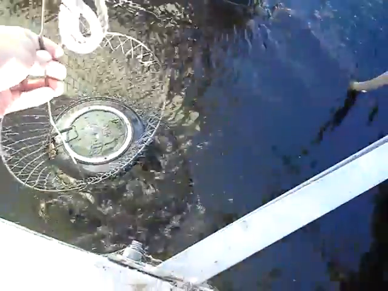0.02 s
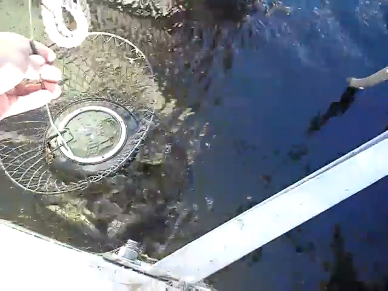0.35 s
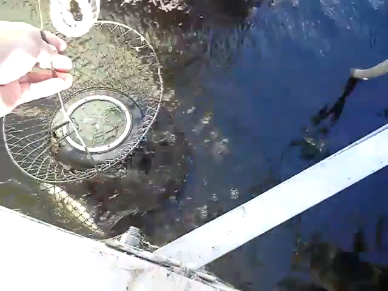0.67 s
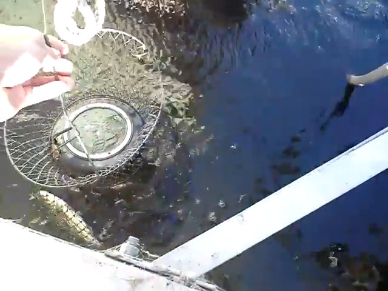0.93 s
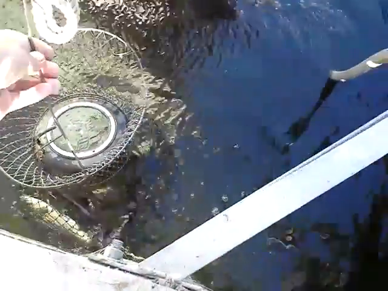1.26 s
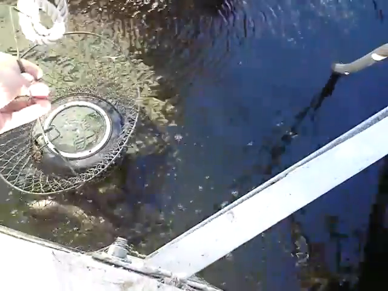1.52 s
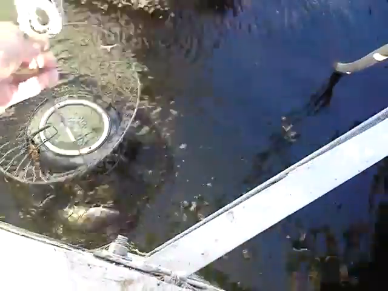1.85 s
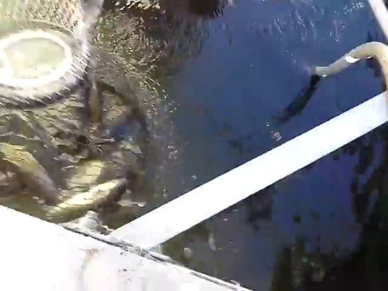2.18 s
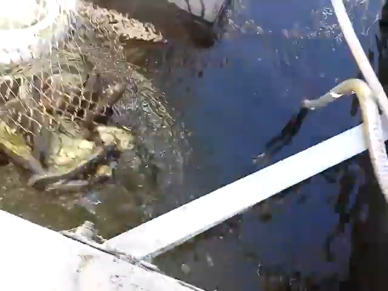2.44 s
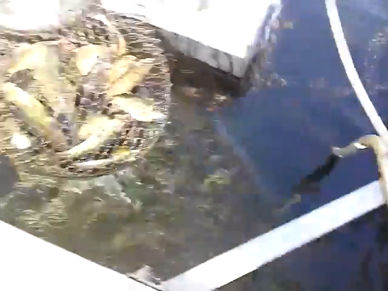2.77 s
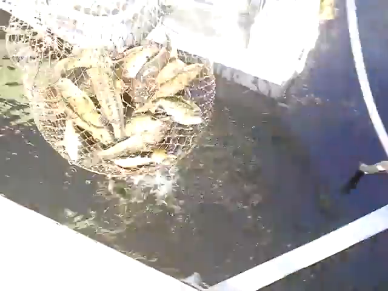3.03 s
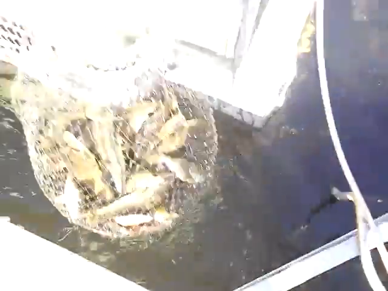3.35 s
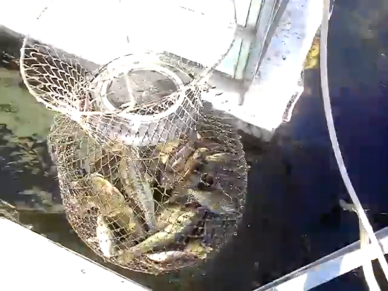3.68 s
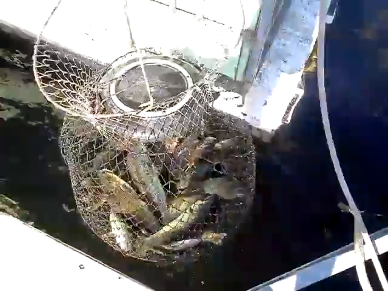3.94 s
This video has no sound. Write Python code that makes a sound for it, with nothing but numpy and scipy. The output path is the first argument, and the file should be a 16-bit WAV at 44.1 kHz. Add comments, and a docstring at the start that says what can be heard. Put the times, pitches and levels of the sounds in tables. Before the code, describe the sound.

Gusty wind rumbling on the microphone over small splashes and water draining from a fish basket.

```python
"""Beside a dock, one microphone in the open air, close to a wire fish basket. Gusts buffet it throughout.
At first the basket is under: the surface trickles, fish flick and splash, and one pings the wire at 1.5 s.
From 2.2 s the basket is hauled out; large bubbles glug, then water pours from the mesh and patters down.
Around 3.5 s the strongest gust blows a hollow note across the microphone port and overloads the input."""
import sys
import numpy as np
from scipy.fft import rfft, irfft, next_fast_len
from scipy.io import wavfile
from scipy.ndimage import map_coordinates

SR = 44100
rng = np.random.default_rng(int(sys.argv[2]) if len(sys.argv) > 2 else 0)


def pcm_store(signal):
    """Save signal as 16-bit PCM."""
    levels = np.round(np.clip(np.atleast_2d(signal), -1, 1) * 32767)
    wavfile.write(sys.argv[1], SR, levels.astype(np.int16).T)


N = 176400

# Water at the basket, beside the dock: time_s, level_db
WATER_FLOW = [(0, -33), (.3, -47), (1.15, -38.5), (1.45, -41.5), (1.62, -37), (1.69, -50), (1.8, -36.5),
              (2.07, -52), (2.2, -41.5), (2.36, -39.5), (2.5, -29), (2.62, -20.5), (2.72, -26), (2.86, -26),
              (3.02, -18), (3.75, -26.5), (3.86, -31), (4, -26)]
# Spectrum of the surface stirred by the fish: frequency_hz, gain_db
RIPPLE_SPECTRUM = [(300, -19.5), (1000, -2.5), (2000, -13), (3300, -11.5), (5000, -1), (6200, -9),
                   (7500, -34), (9000, -37)]
# Spectrum of water falling from the mesh: frequency_hz, gain_db
SPRAY_SPECTRUM = [(300, -23), (750, -6), (1500, -12), (2800, -13), (5000, -5), (6000, -8), (7300, -11),
                  (10000, -15.5)]
def water(lift_start_s=2.23, lift_length_s=0.12, drop_hz=4046, drop_spread=0.444, drops_db=-1):
    """Droplets over a hiss: an uneven trickle while the basket is under, a steadier spray as it drains."""
    flow_db, = curves(WATER_FLOW)
    drips = amp(drops_db) * droplets(drop_hz, drop_spread, count=2000)
    drops = amp(drops_db) * droplets(drop_hz, drop_spread, count=6000)
    hiss, clumps = rng.standard_normal(N), wobble(50)
    ripple = amp(3.5 * clumps) * unit(coloured(drips + hiss, RIPPLE_SPECTRUM))
    spray = amp(clumps) * unit(coloured(drops + hiss, SPRAY_SPECTRUM))
    lifted = np.clip((np.arange(N) / SR - lift_start_s) / lift_length_s, 0, 1)
    return amp(flow_db) * ((1 - lifted) * ripple + lifted * spray)


def droplets(centre_hz, spread, count, samples=500, ring_cycles=49, scatter_db=3.5):
    """A steady patter of tiny ringing bubbles, rms 1."""
    start = rng.integers(0, N, count)[:, None]
    hz = np.clip(centre_hz * np.exp(spread * rng.standard_normal((count, 1))), 500, 10000)
    strength = amp(scatter_db * np.minimum(rng.exponential(size=(count, 1)), 4))
    t = np.arange(samples) / SR
    rings = strength * np.sin(2 * np.pi * hz * t) * fade(t, ring_cycles / hz)
    return unit(np.bincount((start + np.arange(samples)).ravel(), rings.ravel(), N)[:N])


# Large bubbles where the basket breaks the surface: start_s, level_db, pitch_hz
LARGE_BUBBLES = [(2.506, -21, 1074), (2.526, -15, 639), (2.552, -16, 685), (2.588, -12, 782),
                 (2.643, -15.5, 690)]
def glugs(t60_s=0.09, attack_s=0.0024, rise_per_s=1.2, rough_rad=0.31):
    """Air enters under the basket: deformed bubbles ring unevenly and rise in pitch amid a fine froth."""
    t = np.arange(SR // 5) / SR
    froth = droplets(centre_hz=850, spread=.25, count=1000, samples=2000)
    out = amp(-29.5) * swell(2.61, .1) * froth
    for start_s, db, hz in LARGE_BUBBLES:
        phase = 2 * np.pi * hz * (t + rise_per_s * t ** 2 / 2) + rough_rad * wobble(hz / 2)[:len(t)]
        add(out, start_s, amp(db) * np.sin(phase) * fade(t, t60_s) * (1 - np.exp(-t / attack_s)))
    return out


# Flicking fish and falling drops at the surface: start_s, level_db, pitch_hz
SURFACE_SPLASHES = [(0.536, -31.5, 4860), (0.829, -33.5, 4840), (1.546, -24, 5080), (1.57, -31, 2180),
                    (1.618, -33.5, 4200), (1.735, -37, 5900), (1.773, -29, 5800), (1.881, -25, 3180),
                    (2.215, -29.5, 5250)]
def splashes(width_octaves=0.34, attack_s=0.00074, t60_s=0.063):
    """Each flick of a tail or large drop throws a short burst of spray."""
    out, t = np.zeros(N), np.arange(SR // 4) / SR
    envelope = 2 * fade(t, t60_s) * (1 - np.exp(-t / attack_s))
    for start_s, db, pitch_hz in SURFACE_SPLASHES:
        noise = rng.standard_normal(len(t))
        spray = filtered(noise, lambda hz: 1 / (1 + (np.log2((hz + 1) / pitch_hz) / width_octaves) ** 2))
        add(out, start_s, amp(db) * unit(spray) * envelope)
    return out


# Ringing modes of the basket's mesh: pitch_hz, level_db, t60_s
WIRE_MODES = [(3210, -25.5, 0.074), (3640, -23, 0.07), (4840, -13, 0.034), (7300, -27, 0.037)]
def wire_ping(start_s=1.548):
    """A fish knocks the wet mesh, which gives one short ping."""
    out, t = np.zeros(N), np.arange(SR // 4) / SR
    add(out, start_s, sum(amp(db) * np.sin(2 * np.pi * hz * t) * fade(t, t60) for hz, db, t60 in WIRE_MODES))
    return out


# Gusts right on the microphone: time_s, level_db, eddy_edge_hz
GUSTS = [(0, -4.5, 195.6), (.21, -10.5, 151.6), (.29, -23.5, 143), (.37, -9, 199.7), (.48, -5.5, 208),
         (.57, -19.5, 173.7), (.78, -22.5, 150.5), (.93, -18, 157.7), (1.48, -17, 196), (1.52, -23.5, 162),
         (1.83, -27.5, 100), (1.96, -14, 230), (2.09, -25.5, 150), (2.29, -20, 149), (2.35, -43, 125),
         (2.52, -32, 99.4), (2.85, -30.5, 93.4), (2.875, -7.5, 180.2), (3.12, -16, 168.6),
         (3.24, -6, 214.7), (3.46, -6.5, 215.3), (3.5, 2.5, 450), (3.67, 1, 594), (3.785, -5, 777),
         (3.82, -16, 376), (4, -13, 484)]
# Sharp puffs on top of them: centre_s, half_length_s, boost_db, rise_octaves
SHARP_PUFFS = [(0.064, 0.022, 9.5, 0.89), (0.188, 0.02, 10.5, 0.8), (0.472, .01, 7.5, 0.84),
               (0.522, 0.0069, 11, 1.05), (0.647, 0.008, 16.5, 1.25), (0.9, 0.009, 19.5, 1.05),
               (0.975, 0.018, 10.5, 1.12), (1.127, 0.008, 20, 1.65), (1.169, 0.012, 7.5, 1),
               (1.242, 0.0068, 10.5, 0.77), (1.303, 0.011, 8.5, 1.27), (1.542, 0.0066, 21, 0.84),
               (2.034, 0.0078, 8.5, 0.4), (2.164, 0.016, 17.5, 0.6), (2.214, 0.0097, 15, 0.7),
               (2.899, 0.016, 7.5, 0.69), (2.965, 0.0087, 8, .5), (3.165, 0.011, 19.5, 1.35),
               (3.282, .02, 7.5, 1.0), (3.366, .007, 7.5, 0.68), (3.534, .012, 1, .6), (3.66, .011, 5, .5)]
def wind(flutter_db=4.5, flutter_octaves=0.083, rumble_db=-8, sputter_db=-3):
    """Eddies sweep the microphone: faster air buffets higher and more raggedly, with less slow rumble."""
    level_db, edge_hz = curves(GUSTS)
    speed = edge_hz / EDDY_EDGE_HZ
    flutter = wobble(65)  # turbulence
    buffet_db = flutter_db * flutter
    octaves = np.log2(speed) + flutter_octaves * speed * flutter
    for centre_s, half_length_s, boost_db, rise_octaves in SHARP_PUFFS:
        puff = swell(centre_s, half_length_s)
        buffet_db += boost_db * puff
        octaves += rise_octaves * puff
    swings = amp(rumble_db) * np.minimum(1 / speed, 1) * rumble()
    pops = amp(sputter_db) * np.minimum(speed, 1) ** 2 * sputter()
    return amp(level_db) * (amp(buffet_db) * eddies(octaves) + swings + pops)


EDDY_EDGE_HZ = 200
# Spectrum of the buffeting with its upper edge at EDDY_EDGE_HZ: frequency_hz, gain_db
EDDY_SPECTRUM = [(15, -6.5), (40, -1.5), (110, -1), (200, -3), (330, -8), (520, -16), (900, -30.5),
                 (1800, -57), (8000, -130)]
def eddies(edge_octaves, count=12):
    """Buffeting noise whose spectrum slides: a cross-fade of noises half an octave apart."""
    out = np.zeros(N)
    position = np.clip(2 * edge_octaves + 3, 0, count - 1)
    for k in range(count):
        shift = 2 ** ((k - 3) / 2)
        noise = unit(coloured(rng.standard_normal(N), [(hz * shift, db) for hz, db in EDDY_SPECTRUM]))
        out += noise * np.sqrt(np.maximum(1 - np.abs(position - k), 0))
    return out


# Hollow note at the microphone port: time_s, level_db, pitch_hz
PORT_NOTE = [(3.3, -70, 400), (3.52, -13, 520), (3.77, -3.5, 1051), (3.82, -17, 499.5),
             (3.93, -13.5, 479.6), (3.97, -6.5, 762)]
def howl(width_hz=380):
    """The strongest gust blows across the port: a narrow band of noise that glides in pitch."""
    level_db, hz = curves(PORT_NOTE)
    band = wobble(width_hz) + 1j * wobble(width_hz)
    return amp(level_db) * unit(np.real(band * np.exp(2j * np.pi * np.cumsum(hz) / SR)))


# Round, low buffets on the diaphragm: centre_s, half_length_s, level_db, pitch_hz
LOW_BUFFETS = [(0.183, .035, 2, 104.7), (0.384, .035, 2.5, 105), (1.865, 0.011, -10, 95),
               (2.164, 0.02, -2.5, 150)]
def thumps(waver=.25):
    """Large vortices rock the diaphragm for a few wavering cycles."""
    uneven_t = np.cumsum(np.exp(waver * wobble(90))) / SR
    return sum(amp(db) * swell(centre_s, half_length_s) * np.sin(2 * np.pi * hz * uneven_t)
               for centre_s, half_length_s, db, hz in LOW_BUFFETS)


# The sharpest pops of wind on the port: centre_s, level_db
PORT_POPS = [(0.242, 1), (.618, -4.5), (.826, -1.5), (.967, 14.5), (1.733, -7), (1.934, -5), (2.134, -2)]
def knocks(half_length_s=.0014):
    """A small eddy hits the port: one quick push and pull."""
    t = np.arange(N) / SR
    return sum(2 * amp(db) * (t - s) / half_length_s * swell(s, half_length_s) for s, db in PORT_POPS)


def sputter(count=170, scatter_db=6, pitch_hz=329):
    """Single eddies pop at random moments, rms 1."""
    at = rng.integers(0, N, count)
    push = rng.choice([-1, 1], count) * amp(scatter_db * np.minimum(rng.exponential(size=count), 2))
    kicks = np.bincount(at, push, N)
    pops = filtered(kicks, lambda hz: 1j * hz / (pitch_hz + 1j * hz) * np.exp(-(hz / pitch_hz) ** 2 / 2))
    return unit(pops)


# Spectrum of the rumble at the microphone: frequency_hz, gain_db
RUMBLE_SPECTRUM = [(10, -27.5), (28, -2), (60, -5.5), (120, -16.5), (300, -37.5), (1000, -100)]
def rumble():
    """Slow pressure swings under the gusts, rms 1."""
    return unit(coloured(rng.standard_normal(N), RUMBLE_SPECTRUM))


def amp(db):
    """Decibels to gain."""
    return 10 ** (np.asarray(db) / 20)


def unit(x):
    """Scale to rms 1."""
    return x / np.sqrt(np.mean(x ** 2) + 1e-20)


def curves(rows):
    """One value per sample for each column after the time."""
    times, *columns = np.transpose(rows)
    return [np.interp(np.arange(N) / SR, times, column) for column in columns]


def wobble(rate):
    """A smooth random curve, rate knots a second."""
    return map_coordinates(rng.standard_normal(4096), [np.arange(N) * rate / SR], mode="wrap")


def filtered(x, response):
    """Filter x by a response given as a function of frequency."""
    size = next_fast_len(len(x) + 8192)
    return irfft(rfft(x, size) * response(np.fft.rfftfreq(size, 1 / SR)), size)[:len(x)]


def coloured(x, points):
    """Shape x by (frequency_hz, gain_db) points on a log axis."""
    points_hz, db = np.transpose(points)
    return filtered(x, lambda hz: amp(np.interp(np.log(hz + 1), np.log(points_hz), db)))


def fade(t, t60):
    """Exponential decay that loses 60 dB in t60."""
    return np.exp(-np.log(1000) * t / t60)


def swell(centre_s, half_length_s):
    """A bell-shaped envelope."""
    return np.exp(-np.minimum(((np.arange(N) / SR - centre_s) / half_length_s) ** 2, 20))


def add(track, start_s, sound):
    """Mix a sound into the track."""
    part = track[max(round(start_s * SR), 0):][:len(sound)]
    part += sound[:len(part)]


def scene():
    """Wind and basket at one dockside microphone."""
    air = wind() + thumps() + knocks() + howl()
    return (air + water() + splashes() + glugs() + wire_ping())[None]


# The recorder's treble roll-off: frequency_hz, gain_db
TREBLE_ROLL_OFF = [(5000, 0), (7000, -2), (7800, -8), (8700, -22), (9800, -52)]
def record(dry):
    """Gusts overload the input; the recorder dulls the treble and shaves overshoots into faint crackle."""
    overload_db, hardness, ceiling_db, top_hz = -2.95, 50, -2.92, 15900
    clipped = dry[0] / (1 + np.abs(dry[0] / amp(overload_db)) ** hardness) ** (1 / hardness)
    shaved = np.clip(coloured(clipped, TREBLE_ROLL_OFF), -amp(ceiling_db), amp(ceiling_db))
    return filtered(shaved, lambda hz: hz < top_hz)[None]


dry = scene()
out = record(dry)
pcm_store(out)
```